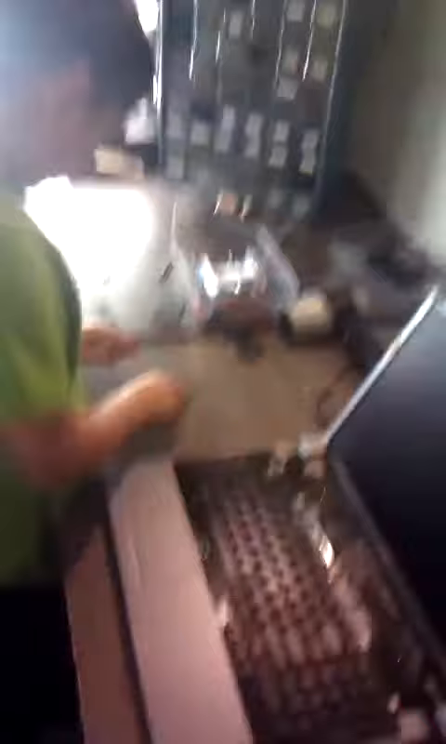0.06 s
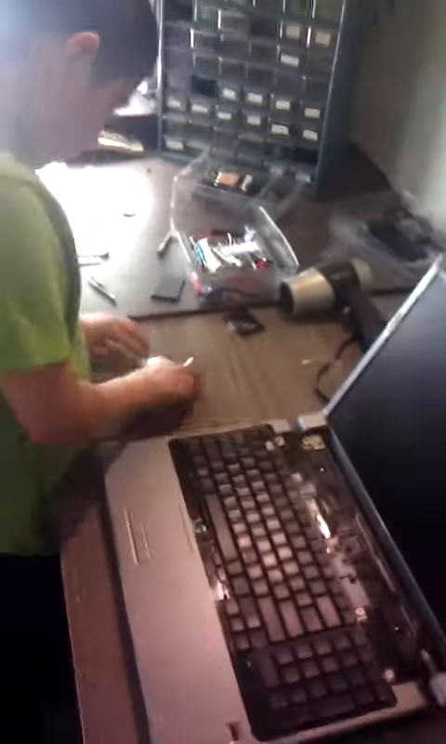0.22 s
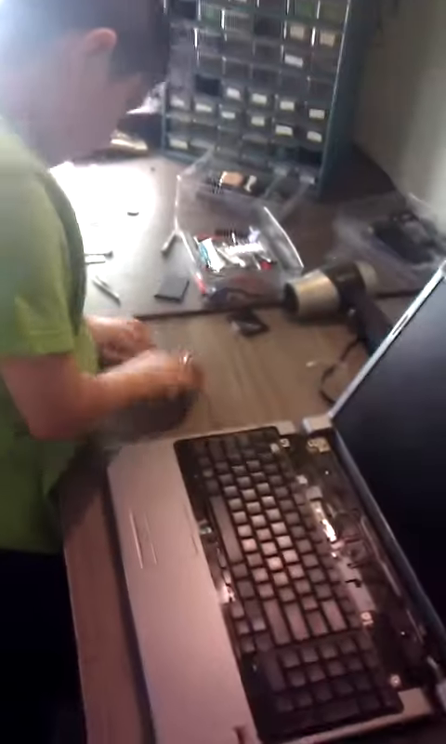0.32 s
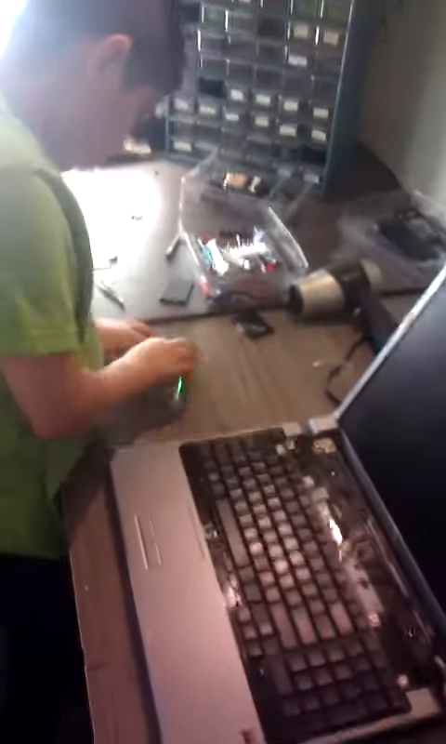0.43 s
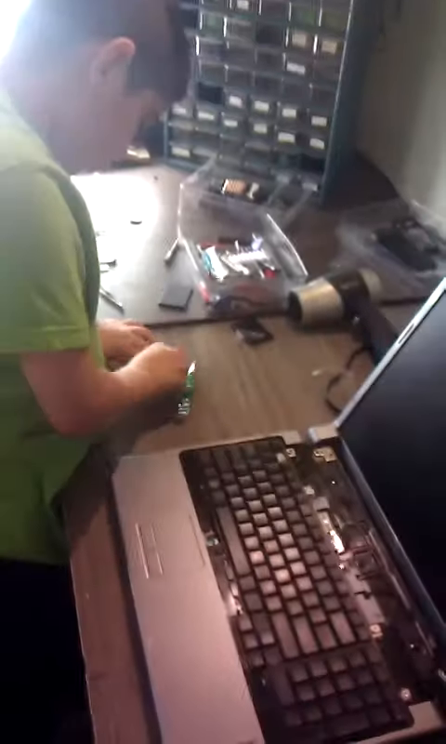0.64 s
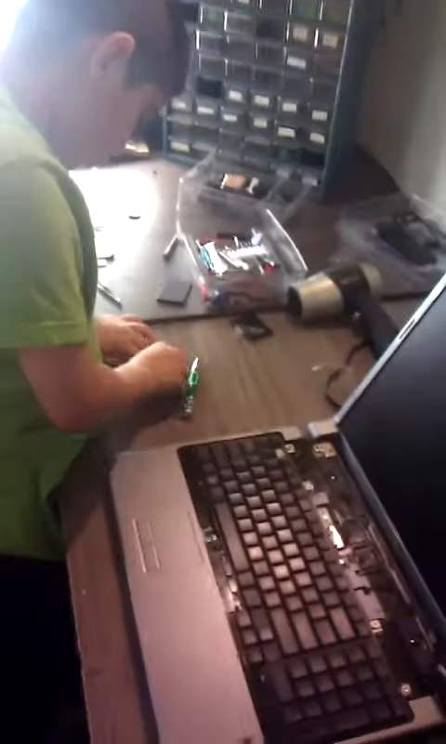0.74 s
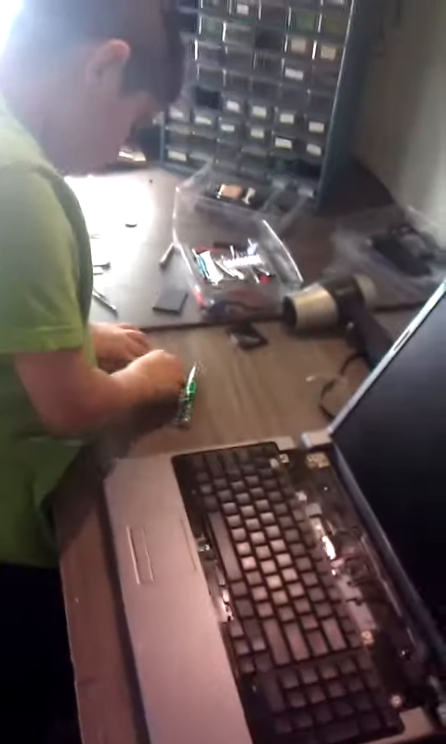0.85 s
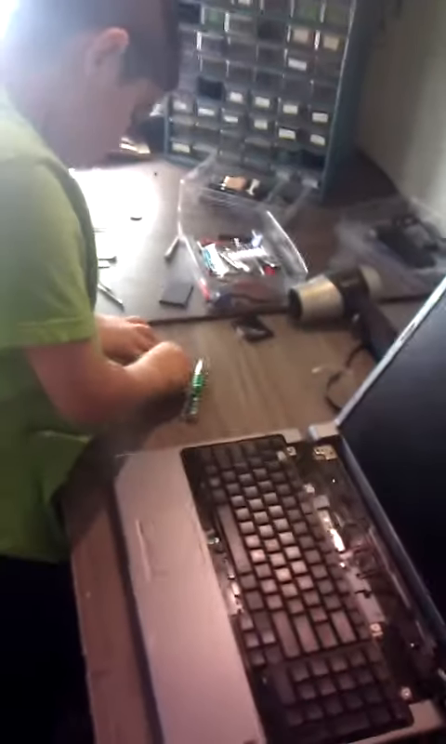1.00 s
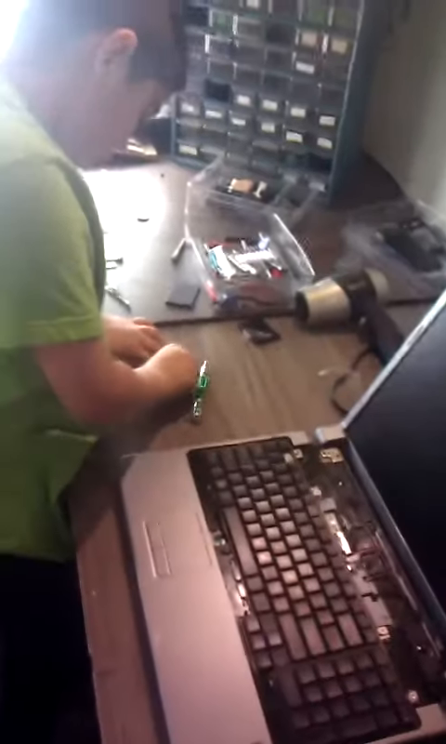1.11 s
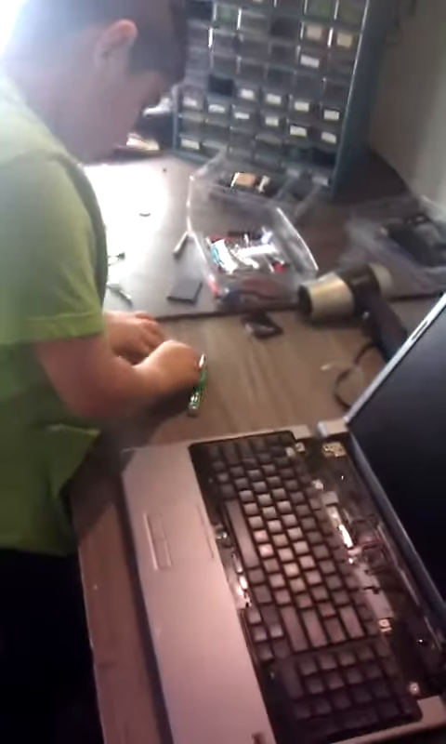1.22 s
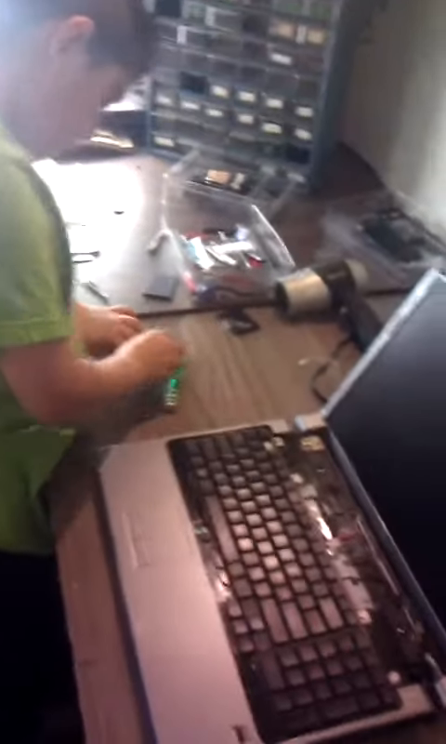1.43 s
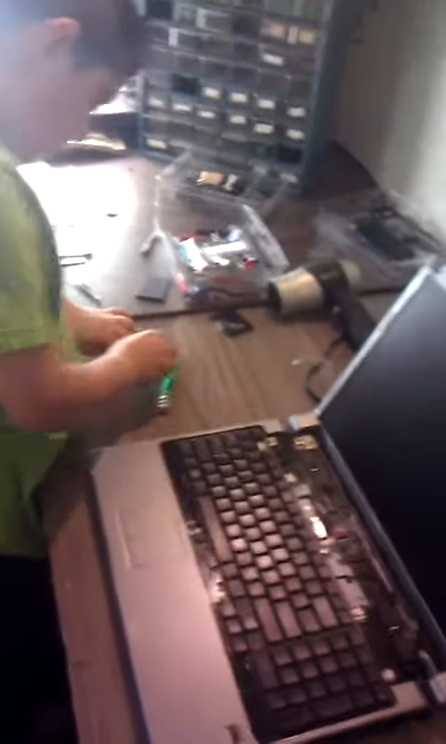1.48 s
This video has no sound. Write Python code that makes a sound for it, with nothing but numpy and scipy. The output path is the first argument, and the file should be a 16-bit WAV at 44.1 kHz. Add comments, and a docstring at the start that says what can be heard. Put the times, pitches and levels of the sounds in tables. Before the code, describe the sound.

Screwdriver knocking and settling on a wooden desktop, then small metallic screw ticks in a quiet room

```python
"""Steady, mostly low room noise and faint sliding friction are heard first, then small screws tick.
A small screwdriver knocks, clatters and settles on a wooden desk; a hand comes softly to rest.
Ticks and knocks are shaped impulses exciting dense damped vibration and decaying modal tones.
Friction and room noise are filtered noise; sparse random reflections form the reverberation.
A low-pass filter limits the band of the microphone."""
import sys
import numpy as np
from scipy import signal
from scipy.fft import rfft, irfft
from scipy.io import wavfile
from scipy.ndimage import uniform_filter1d

SR = 44100
rng = np.random.default_rng(int(sys.argv[2]) if len(sys.argv) > 2 else 0)


def generate_wav(signal):
    """Clip the signal to [-1, 1] and save it as 16-bit WAV at the path in sys.argv[1]."""
    frames = np.transpose(np.atleast_2d(signal))
    scaled = np.clip(frames, -1, 1) * 32767
    pcm = np.round(scaled).astype(np.int16)
    wavfile.write(sys.argv[1], SR, pcm)


N = 68355  # length of the scene [samples]
TAPS = 4096  # length of an impulse or burst [samples]

# Spectrum of the steady room noise: (frequency [Hz], relative density [dB])
AIR_SPECTRUM = [(25, -33.5), (60, -29.5), (85, -24), (108, -6), (135, -14), (180, -16.5), (225, -4.5),
                (275, 1.5), (330, -3), (440, 3), (560, -4), (720, -2.5), (1100, -10.5), (1400, -9.5),
                (1900, -6), (2300, -8), (2700, -13), (3400, -17), (4600, -22.5), (5700, -37.5),
                (7500, -21.5), (8500, -33.5)]
AIR_DB = -51.5

# Friction of the screwdriver sliding lightly over the desk: (time [s], level [dB])
SLIDE_LEVEL = [(.36, -55), (.43, -47.5), (0.521, -59), (0.761, -56.5), (.83, -49), (.92, -52), (1.0, -51),
               (1.13, -54), (1.211, -52), (1.252, -40.5), (1.29, -50), (1.4, -66)]
# Friction coloured by the desk resonances: (frequency [Hz], relative level [dB])
SLIDE_SPECTRUM = [(150, -25.5), (300, -4.5), (650, -4.5), (920, -1), (1200, -7.5), (1750, 1), (2050, -2.5),
                  (2300, 7), (2600, -3.5), (4000, -21), (8000, -50.5)]

# Screws ticking between the fingers: (time [s], strength [dB], scrape decay T60 [s],
# snap relative to clack [dB], relative ring [dB])
TICKS = [(.040, -22, 0.028, -6.5, -6), (0.0472, -24, 0.021, -7, -10), (.058, -18.5, 0.0093, -6.5, -8),
         (0.838, -30, 0.03, -12, -4), (1.212, -34, 0.022, 0, 0), (1.2826, -15.5, 0.0068, 1, -15),
         (1.287, -21, 0.064, -5, -1), (1.308, -25, 0.043, 0, 2), (1.3378, -20.5, .04, -17, 0.5),
         (1.343, -19.5, 0.05, -9, 2), (1.3622, -16.5, .03, -17, -6), (1.3645, -11.5, 0.029, -11.5, 0),
         (1.3725, -28.5, 0.005, 1, -17)]
# Colour of a screw contact: (frequency [Hz], relative level [dB])
SCREW_SPECTRUM = [(150, -43), (500, -32), (1300, -14.5), (2300, -5.5), (3000, -2), (3450, -1), (3900, 2),
                  (4300, 2), (5600, -15), (7000, -3.5), (8500, -17)]
# Ringing modes of a screw: (frequency [Hz], relative level [dB], decay T60 [s])
SCREW_MODES = [(3060, -13.5, 0.018), (3495, 1.5, 0.052), (3870, -12, 0.023), (4400, -0.5, .03),
               (7990, -6.5, 0.024)]
SCREW_RING_DB = -6

# Reverberation time of the room: (frequency [Hz], decay T60 [s])
ROOM_T60 = [(200, 0.74), (550, 0.46), (1400, 0.23), (3700, .24), (8000, 0.21)]
ROOM_DELAY_S = 0.008
KNOCK_ROOM_DB, TICK_ROOM_DB = -11.5, -13.5

# Screwdriver contacts on the desk: (time [s], strength [dB], thud [dB], clack [dB], snap [dB],
# ring [dB], mode favoured at that spot [Hz], crack pitch [Hz], relative crack [dB])
KNOCKS = [(.1995, 6.5, -3, 0.5, 9, -3.5, 2620, 3330, -9), (0.2051, -3.5, 0, 3, -6.5, -6, 1802, 2626, -5),
          (0.2152, -16, -12, 5, -4, -14, 1420, 3700, -8), (0.2527, 1, -6.5, 3.5, -18, 2, 1756, 2580, -10),
          (0.2607, -1, 0, 0, -14, 2.5, 1756, 3500, -14.5),
          (0.2736, -10.5, 10, -2, -13, -3.5, 910, 1100, -17),
          (0.2813, 0.5, 7.5, -8, 1.5, 2, 2255, 2290, -3), (0.2986, 8, -0.5, -0.5, -1, 1, 1756, 3340, -14.5),
          (.3068, 4, -5, -14, 2.5, 0.5, 1402, 3020, -6.5), (0.32, -7, 3, -13, -13, 1, 1756, 1500, -18),
          (.333, -5, 1, -17.5, -20.5, 2, 1402, 1334, -3),
          (0.3461, -11.5, 8.5, -7.5, -2, 2.5, 1044, 1027, 2.5),
          (0.3623, -16.5, 2.5, -13, -9, 1, 1756, 1750, -10.5),
          (0.6171, -15.5, 6.5, -1, -11, -3.5, 1756, 2910, -13),
          (.622, -16.5, 1.5, -33, -11, 5.5, 1756, 1815, 2), (0.7404, 2.5, -4, -7, -1, -1, 2200, 2238, -9),
          (0.7498, -7, 4, -17, -16, -1, 905, 1690, -7), (1.2548, -0.8, -2.5, 1.5, -3, -1, 2362, 2512, -3),
          (1.2624, -4.5, -8, -13, -3, -2, 2362, 2260, -5), (1.277, -16.5, 1, 10, -3, -35, 905, 3790, -2),
          (1.4474, -16, 1, -13, -8, 3, 2240, 2480, -6.5)]
# Modes of desk top and screwdriver shaft: (frequency [Hz], relative level [dB], decay T60 [s])
DESK_MODES = [(269.6, -19, 0.3), (429.7, -15, 0.16), (667, -13, .2), (808.5, -18.5, 0.54), (908, -9, 0.2),
              (1020, -6.5, .13), (1275, -11, 0.2), (1394, -6.5, 0.13), (1590, -18.5, 0.22),
              (1742, -5.5, 0.12), (1759, -0.5, 0.096), (1940, 2.5, 0.054), (2181, -5, 0.086),
              (2252, -7.5, .14), (2345, -1, 0.061), (2643, -1.5, 0.088), (2780, -21, 0.085),
              (3043, -5, 0.063), (3610, -12, 0.054), (4490, -19.5, 0.12)]
# Colour of the dense, quickly damped desk vibration: (frequency [Hz], relative level [dB])
BODY_SPECTRUM = [(60, -51.5), (170, -19.5), (240, -8), (600, -6.5), (1150, -5), (1800, 1.5), (2400, -1),
                 (3500, -7.5), (4400, -18), (5500, -30.5), (8000, -38)]
# Frequencies at which the force spectrum of a contact is set [Hz]
THUD_HZ, MID_HZ, CLACK_HZ, SNAP_HZ = 690, 2360, 3200, 5200
BODY_T60_S = 0.083
BODY_DB, RING_DB, CONTACT_DB = -4, -3.5, -21.5
SPOT_DB, SPOT_WIDTH_HZ = 6.5, 73  # boost of modes near the favoured one
CRACK_T60_S, CRACK_RISE_S = 0.012, 0.0004

# A hand comes to rest on the desk
BUMP_AT_S, BUMP_LENGTH_S, BUMP_HZ, BUMP_DB = 0.590, 0.026, 272, -43.5

EDGE_HZ = 8750  # upper band edge of the microphone


def amp(db):
    """Logarithmic level: converts decibels to an amplitude ratio."""
    return 10 ** (np.asarray(db) / 20)


def unit(x):
    """Energy normalisation: scales the sum of squares to one."""
    return x / np.sqrt(np.sum(x ** 2) + 1e-20)


def read(points, hz):
    """Logarithmic frequency scale: interpolates a table along it."""
    table_hz, value = np.transpose(points)
    return np.interp(np.log(hz + 1), np.log(table_hz + 1), value)


def add(mix, start_s, sound):
    """Superposition: adds a sound into the mix in place at a given time."""
    part = mix[round(start_s * SR):][:len(sound)]
    part += sound[:len(part)]


def noise(points):
    """Spectral shaping: filters white noise to a given spectrum and unit rms."""
    white = rfft(rng.standard_normal(N))
    shaped = white * amp(read(points, np.fft.rfftfreq(N, 1 / SR)))
    return unit(irfft(shaped, N)) * np.sqrt(N)


def pulse(points):
    """Minimum phase: derives a causal click from its log spectrum by the Hilbert transform."""
    hz = abs(np.fft.fftfreq(TAPS, 1 / SR))
    log_gain = np.log(amp(read(points, hz)))
    return np.fft.ifft(np.exp(np.conj(signal.hilbert(log_gain)))).real


def burst(t60, count=3):
    """High modal density: crowded modes of like strength, struck together, decay as noise."""
    t = np.arange(TAPS) / SR
    fade = amp(-60 * t / t60)
    x = rng.standard_normal(TAPS) * fade
    # Even out the spectrum and the decay in turn
    for _ in range(count):
        spectrum = rfft(x)
        power = uniform_filter1d(abs(spectrum) ** 2, size=40)
        x = irfft(spectrum / np.sqrt(power + 1e-12))
        envelope = np.sqrt(abs(uniform_filter1d(x ** 2, size=90)) + 1e-18)
        x = x / envelope * fade
    return unit(x)


def dying(modes):
    """Modal decay: one exponentially damped cosine per mode, neighbours opposite in sign."""
    t = np.arange(SR // 3) / SR
    hz, db, t60 = np.transpose(modes)[:, :, None]
    sign = (-1) ** np.arange(len(modes))[:, None]
    return sign * amp(db - 60 * t / t60) * np.cos(2 * np.pi * hz * t)


def room_noise():
    """Stationary random noise: a fixed spectrum at a constant level."""
    return amp(AIR_DB) * noise(AIR_SPECTRUM)


def sliding(grain_db=2):
    """Dry friction: faint noise in the desk resonances, its level randomly uneven."""
    grain = uniform_filter1d(rng.standard_normal(N), size=400)
    grain = unit(grain) * np.sqrt(N)
    level_db = np.interp(np.arange(N) / SR, *np.transpose(SLIDE_LEVEL))
    return noise(SLIDE_SPECTRUM) * amp(level_db + grain_db * grain)


def screws():
    """Impact of small bodies: a bright contact excites a short scrape and a metallic ring."""
    out = np.zeros(N)
    colour = pulse(SCREW_SPECTRUM)
    highpass = signal.butter(2, 2000, "high", fs=SR, output="sos")
    ring = unit(signal.sosfilt(highpass, dying(SCREW_MODES).sum(0)))
    for start_s, db, t60, snap_db, ring_db in TICKS:
        contact = pulse([(CLACK_HZ, 0), (SNAP_HZ, snap_db)])
        force = signal.fftconvolve(colour, contact)
        scrape = unit(signal.fftconvolve(force, burst(t60)))
        add(out, start_s, amp(db) * scrape)
        add(out, start_s, amp(db + ring_db + SCREW_RING_DB) * ring)
    return out


def room(x):
    """Reverberation: sparse random reflections, each frequency band decaying at its own rate."""
    count = SR // 2
    present = rng.random(count) < 0.1
    late = np.arange(count) > ROOM_DELAY_S * SR
    taps = rng.standard_normal(count) * present * late
    hz, t, bands = signal.stft(taps, SR, nperseg=256)
    fade = amp(-60 * t / read(ROOM_T60, hz)[:, None])
    tail = signal.istft(bands * fade, SR, nperseg=256)[1]
    return signal.fftconvolve(x, unit(tail))[:N]


def crack(hz):
    """Transient response of the tool: a brief tone that rises quickly and decays exponentially."""
    t = np.arange(TAPS) / SR
    envelope = (1 - np.exp(-t / CRACK_RISE_S)) * amp(-60 * t / CRACK_T60_S)
    return unit(envelope * np.sin(2 * np.pi * hz * t))


def screwdriver():
    """Modal excitation: a soft or hard contact drives the damped desk and its ringing modes."""
    out = np.zeros(N)
    colour = unit(pulse(BODY_SPECTRUM))
    bandpass = signal.butter(4, [200, 4000], "band", fs=SR, output="sos")
    modes = signal.sosfilt(bandpass, dying(DESK_MODES))
    mode_hz = np.transpose(DESK_MODES)[0]
    for start_s, db, thud_db, clack_db, snap_db, ring_db, spot_hz, crack_hz, crack_db in KNOCKS:
        contact = [(THUD_HZ, thud_db), (MID_HZ, 0), (CLACK_HZ, clack_db), (SNAP_HZ, snap_db)]
        force = amp(db) * pulse(contact)
        # The point of contact favours modes near one frequency
        favour = amp(SPOT_DB * np.exp(-((mode_hz - spot_hz) / SPOT_WIDTH_HZ) ** 2))
        response = amp(RING_DB + ring_db) * unit(favour @ modes)
        body = unit(signal.fftconvolve(colour, burst(BODY_T60_S)))
        add(response, 0, amp(BODY_DB) * body)
        add(response, 0, amp(CONTACT_DB) * colour)  # direct click
        add(out, start_s, signal.fftconvolve(force, response))
        add(out, start_s, amp(db + crack_db) * crack(crack_hz))
    return out


def hand():
    """Smooth forcing: a soft push stirs a low tone of the desk under a half-sine swell."""
    t = np.arange(N) / SR - BUMP_AT_S
    swell = np.sin(np.pi * np.clip(t / BUMP_LENGTH_S, 0, 1))
    return amp(BUMP_DB) * np.sin(2 * np.pi * BUMP_HZ * t) * swell


def scene():
    """Linear superposition: direct sounds, their reverberation and the steady noise add."""
    ticks, knocks = screws(), screwdriver()
    echo = room(amp(KNOCK_ROOM_DB) * knocks + amp(TICK_ROOM_DB) * ticks)
    return (room_noise() + sliding() + ticks + echo + knocks + hand())[None]


def record(dry):
    """Band limitation: a linear-phase low-pass filter stands for the microphone."""
    lowpass = signal.firwin(255, EDGE_HZ, window=("kaiser", 7), fs=SR)
    return signal.oaconvolve(dry, lowpass[None], "same")


dry = scene()
out = record(dry)
generate_wav(out)
```